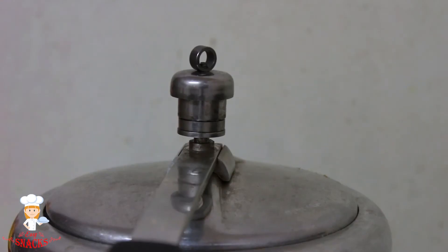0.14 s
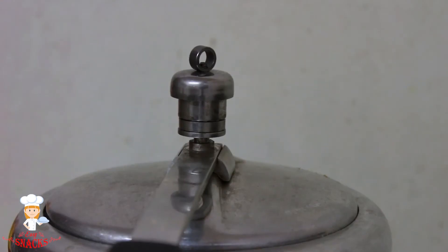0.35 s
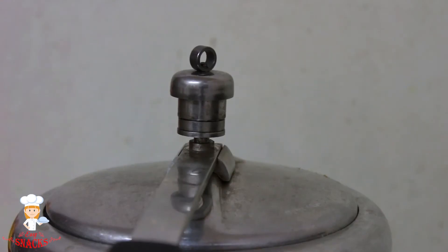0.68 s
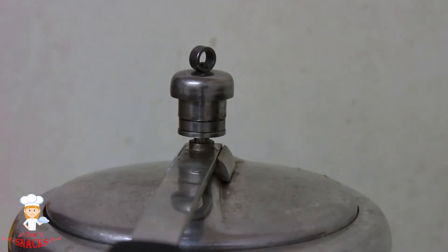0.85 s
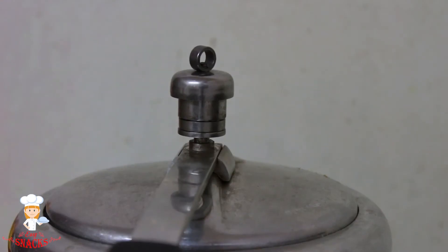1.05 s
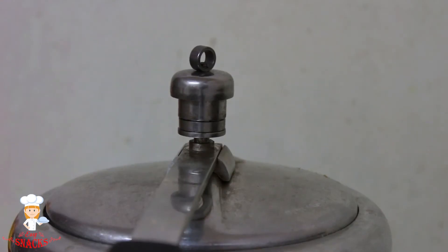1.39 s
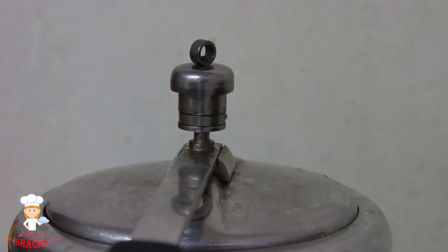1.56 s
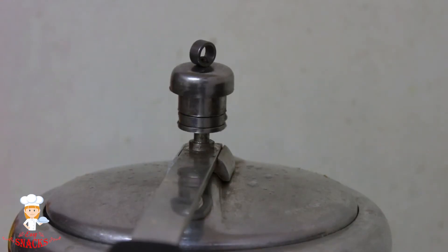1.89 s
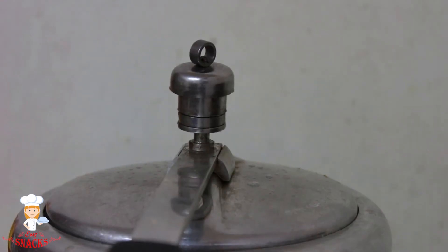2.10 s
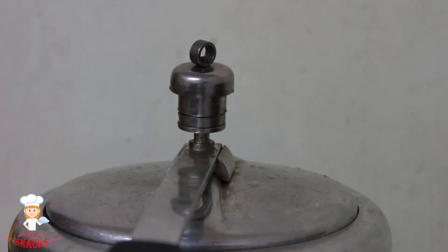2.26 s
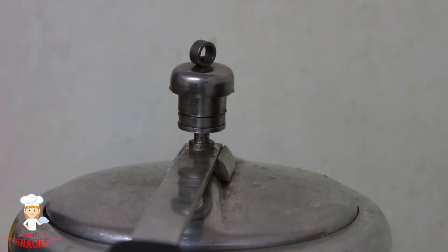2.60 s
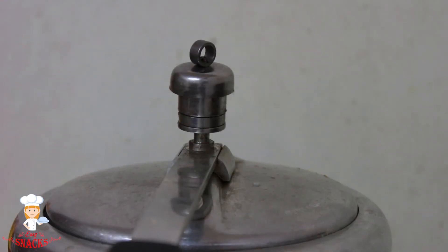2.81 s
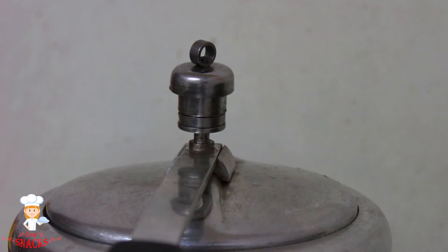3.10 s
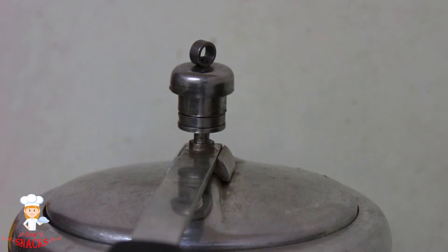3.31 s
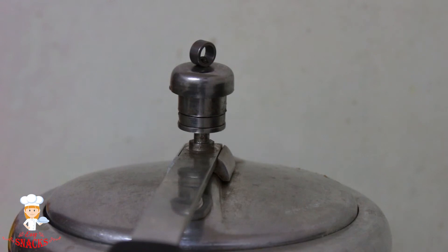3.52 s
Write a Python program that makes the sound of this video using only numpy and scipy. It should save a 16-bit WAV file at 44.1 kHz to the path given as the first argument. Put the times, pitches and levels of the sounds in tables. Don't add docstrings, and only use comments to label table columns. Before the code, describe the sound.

Pressure cooker steam hisses softly, then bursts into a loud, steady, piercing jet

```python
import sys
import numpy as np
from scipy import signal
from scipy.fft import rfft, irfft, next_fast_len
from scipy.io import wavfile
from scipy.ndimage import uniform_filter1d

SR = 44100
rng = np.random.default_rng(int(sys.argv[2]) if len(sys.argv) > 2 else 0)


def waveform_to_disk(signal):
    frames = np.transpose(np.atleast_2d(signal))
    scaled = np.clip(frames, -1, 1) * 32767
    samples = np.round(scaled).astype(np.int16)
    wavfile.write(sys.argv[1], SR, samples)


def linear_from_db(decibels):
    return 10 ** (np.asarray(decibels, float) / 20)


N = 160965


def level(x, db):
    return x * linear_from_db(db) / np.sqrt(np.mean(x ** 2))


def walk(rate):
    hold = int(SR / rate)
    steps = np.repeat(rng.standard_normal(N // hold + 1), hold)
    return 1.29 * uniform_filter1d(uniform_filter1d(steps, hold), hold)[:N]


def hiss(spectrum, gust_db, flicker_db, rate):
    hz, db = np.array(spectrum).T
    n = next_fast_len(N)
    f = np.arange(1, n // 2 + 2) * SR / n
    colour = linear_from_db(np.interp(np.log(f), np.log(hz), db, left=-90, right=-90))
    spec = rfft(rng.standard_normal(n)) * colour
    out, gust = 0, walk(rate)
    for octave in np.arange(4, 15, .5):
        gust = 0.872 * gust + 0.66 * walk(rate)
        shape = np.cos(np.pi * np.clip(np.log2(f) - octave, -.5, .5)) ** 2
        swell_db = gust_db * gust + flicker_db * walk(3.0 * rate)
        out = out + irfft(spec * shape, n)[:N] * linear_from_db(swell_db)
    return level(out, 0)


def ring(x, hz, width):
    return signal.lfilter(*signal.iirpeak(hz, hz / width, fs=SR), x)


def decay(age, t60):
    return 1000. ** (-age / t60)


def gate(t, a, b, edge_s):
    return np.clip(np.minimum(t - a, b - t) / edge_s, 0, 1)


def band(x, lo, hi):
    n = next_fast_len(N)
    f = np.arange(n // 2 + 1) * SR / n
    return irfft(rfft(x, n) * (f >= lo) * (f < hi), n)[:N]


def duck_db(t):
    start_s, depth_db, tau_s = 1.5, -25, .08
    return depth_db * (1 - np.exp(-np.maximum(t - start_s, 0) / tau_s))


# (time [s], level [dB])
STEAM_FLOW = [(0, -29), (.1, -31.5), (.47, -30.5), (.53, -29), (.61, -30), (.69, -28), (.78, -30),
              (.91, -30.5), (.97, -26.5), (1.04, -29.5), (1.3, -29.5), (1.37, -29), (1.44, -21),
              (1.5, -16.5), (1.543, -8.5), (1.78, -12.5), (2.5, -12.5), (3.65, -13.5)]
# (frequency [Hz], density [dB per Hz])
LEAK_SPECTRUM = [(1000, -13), (2500, -4.5), (5100, -5.5), (5700, -1), (6700, -3), (11000, -6),
                 (12500, -15.5), (15300, -21.5)]
# (frequency [Hz], density [dB per Hz])
JET_SPECTRUM = [(150, -44), (400, -32.5), (800, -27), (2330, -11), (5600, -3.5), (8600, -1.5),
                (11200, -5.5), (15800, -19)]
# (frequency [Hz], width [Hz], level [dB])
LID_PEAKS = [(4460, 50, -26), (4810, 63, 0), (5280, 20, 5), (5646, 48, 5.5), (6157, 28, 8.5),
             (6290, 130, -1.5), (7300, 32, -33), (7800, 210, -11.5), (8590, 340, -3), (9200, 100, -6),
             (9680, 21, -5), (9540, 28, 7.5), (10700, 53, 2), (10400, 140, -15)]


def steam(t):
    lift_s, lift_width_s = 1.47, .07
    lid_db, room_db, room_t60_s = -8, -7, .25
    jet_share = .5 + .5 * np.tanh((t - lift_s) / lift_width_s)
    leak = linear_from_db(-0.2) * hiss(LEAK_SPECTRUM, gust_db=.5, flicker_db=0.5, rate=5.82)
    jet = linear_from_db(0.2) * hiss(JET_SPECTRUM, gust_db=-0.28, flicker_db=0.45, rate=7)
    x = np.sqrt(1 - jet_share) * leak + np.sqrt(jet_share) * jet
    x = x * linear_from_db(0.71 * walk(300))
    x = x + linear_from_db(lid_db) * sum(linear_from_db(db + 4) * ring(x, hz, width) for hz, width, db in LID_PEAKS)
    age = np.arange(int(.4 * SR)) / SR
    walls = rng.standard_normal(len(age)) * decay(age, room_t60_s) * (age > .002)
    walls = walls / np.sqrt(np.sum(walls ** 2))
    already_hissing = np.r_[x[len(age):0:-1], x]
    wet = signal.fftconvolve(already_hissing, walls, "valid")[1:N + 1]
    flow_s, flow_db = np.array(STEAM_FLOW).T
    return level(x + linear_from_db(room_db) * wet, 0) * linear_from_db(np.interp(t, flow_s, flow_db) - duck_db(t))


# (frequency [Hz], density [dB per Hz])
RUMBLE_SPECTRUM = [(20, -16), (75, -10), (140, 0), (240, -5.5), (370, -12), (520, -12), (1400, -18.5),
                   (2600, -40)]
# (frequency [Hz], level [dB])
FAN_HUM = [(100, -52), (124, -53), (155, -53), (197, -55), (249, -48), (305, -56)]


def kitchen(t):
    hum = 0
    for (hz, db), spread_db in zip(FAN_HUM, [4.9, 11.0, 4.5, 5.5, 1.4, 5.9]):
        strength = np.sqrt(2) * linear_from_db(db + spread_db * walk(5.9))
        turns = hz * np.cumsum(1 + 0.00701 * walk(6)) / SR
        hum = hum + strength * np.sin(2 * np.pi * turns)
    return linear_from_db(-38.5) * hiss(RUMBLE_SPECTRUM, gust_db=0.0, flicker_db=0.9, rate=3.95) + hum


# (time [s], level [dB])
WEIGHT_PUFFS = [
    (1.543, -22),
    (1.589, -24.5),
    (1.62, -31.5),
]
# (frequency [Hz], density [dB per Hz])
PUFF_SPECTRUM = [(90, -19), (170, -5.5), (300, -7), (520, 2), (800, -3), (1200, 1), (3000, -1), (6000, -12)]


def puffs(t):
    attack_s, t60_s = 0.012, 0.27
    env = 0
    for start_s, db in WEIGHT_PUFFS:
        age = t - start_s
        rise = np.exp(np.minimum(age, 0) / attack_s)
        fall = decay(np.maximum(age, 0), t60_s)
        env = env + linear_from_db(db) * np.where(age < 0, rise, fall)
    return env * hiss(PUFF_SPECTRUM, gust_db=0.9, flicker_db=4.0, rate=12) * linear_from_db(-duck_db(t))


# (frequency [Hz], level [dB], t60 [s])
LID_BOOM = [(172, -36, .3), (395, -41, .3), (515, -34, .25)]


def boom(t):
    age = np.maximum(t - 1.57, 0)
    push = 1 - np.exp(-age / 0.0088)
    modes = sum(linear_from_db(db) * decay(age, t60) * np.sin(2 * np.pi * hz * age) for hz, db, t60 in LID_BOOM)
    return push * modes * linear_from_db(-duck_db(t))


def scene():
    t = np.arange(N) / SR
    return np.tile(steam(t) + puffs(t) + boom(t) + kitchen(t), (2, 1))


# (time [s], centre [Hz])
STEREO_SLIPS = [(.17, 8500), (.29, 9650), (1.22, 11400), (1.29, 9050), (1.588, 11200), (1.87, 4800),
                (1.87, 9100), (2.4, 4700), (2.589, 9100), (2.73, 5060), (2.729, 9100), (3.055, 7100),
                (3.19, 7700), (3.2, 350), (3.52, 330)]
# (start [s], end [s], low edge [Hz], high edge [Hz], level [dB])
LONG_LOW_SLIP = (0.8, 1.4, 300, 622, -16.5)


def stereo_slips(mono, t):
    length_s, edge_ratio, slip_db = 0.028, 1.14, -0.5
    slips = [(s - length_s / 2, s + length_s / 2, hz / edge_ratio, hz * edge_ratio, slip_db)
             for s, hz in STEREO_SLIPS]
    side = 0
    for a, b, lo, hi, db in slips + [LONG_LOW_SLIP]:
        side = side + linear_from_db(db) * gate(t, a, b, 0.018) * np.roll(band(mono, lo, hi), 999)
    return side


# (start [s], end [s], frequency [Hz], level [dB])
FAINT_TONES = [(1.6, 2.28, 32.3, -67), (1.6, 2.28, 64.6, -69), (1.6, 2.4, 96.9, -64),
               (2.67, 3.4, 64.6, -57.5), (3.38, 3.7, 64.6, -64), (2.66, 2.76, 58, -59),
               (2.67, 3.7, 129.2, -70), (2.4, 3.7, 397, -66)]


def faint_tones(t):
    return sum(np.sqrt(2) * linear_from_db(db) * np.sin(2 * np.pi * hz * t) * gate(t, a, b, 0.018)
               for a, b, hz, db in FAINT_TONES)


def top_cut(x):
    return signal.sosfilt(signal.butter(12, 16400, fs=SR, output="sos"), x)


def record(dry):
    headroom = 1.0
    quiet_top_hz, loud_top_hz, top_opens_s = 15150, 15770, 1.465
    t = np.arange(N) / SR
    x = dry[0] * linear_from_db(duck_db(t))
    x = x / (1 + (x / headroom) ** 6) ** (1 / 6) + faint_tones(t)
    top = gate(t, top_opens_s, 9, .02) * band(x, quiet_top_hz, loud_top_hz)
    mid = band(x, 0, quiet_top_hz) + top
    side = stereo_slips(x, t)
    return top_cut(np.clip(np.array([mid + side, mid - side]), -1, 1))


dry = scene()
out = record(dry)
waveform_to_disk(out)
```